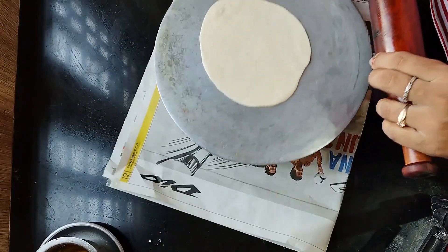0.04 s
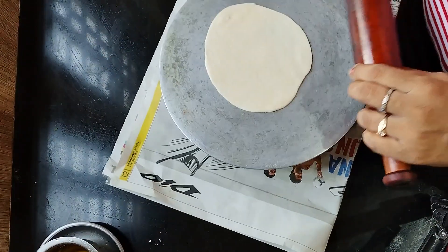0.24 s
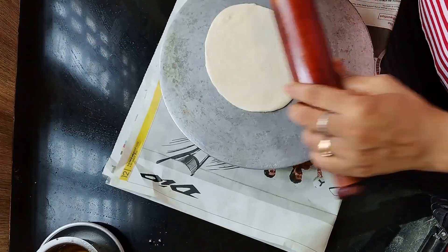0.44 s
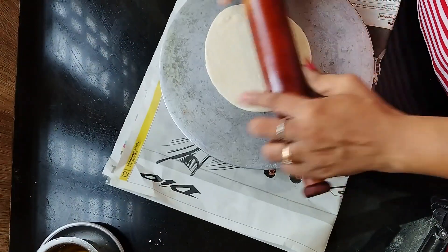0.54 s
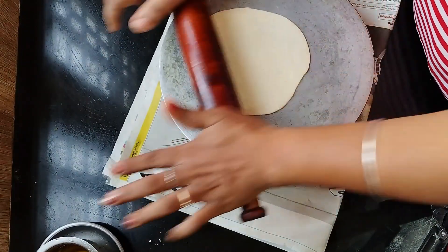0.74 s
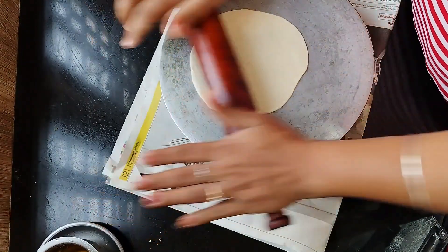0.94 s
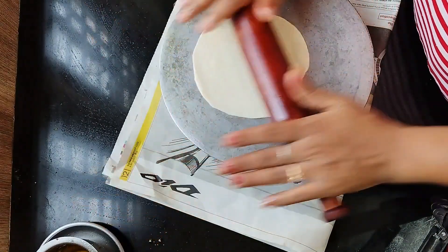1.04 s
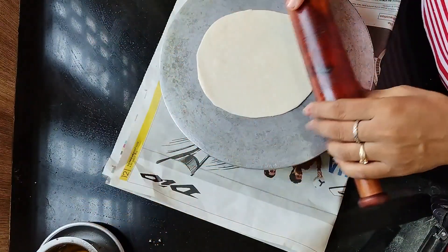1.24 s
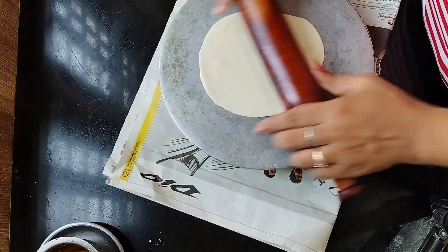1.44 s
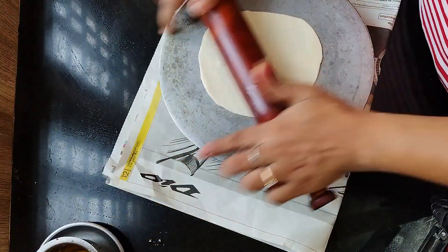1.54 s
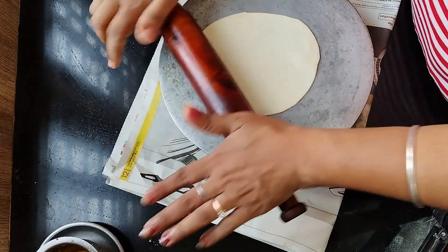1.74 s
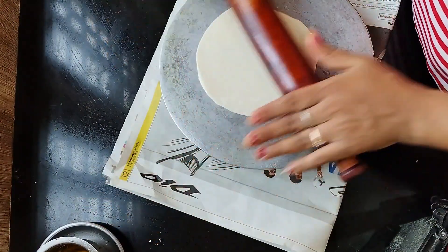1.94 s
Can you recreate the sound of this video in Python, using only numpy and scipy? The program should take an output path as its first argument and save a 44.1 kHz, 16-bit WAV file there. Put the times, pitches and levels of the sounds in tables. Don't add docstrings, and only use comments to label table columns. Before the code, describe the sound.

A wooden rolling pin strikes a round metal plate: paper rustle and a touch at 0.2 s, a loud bright knock at 0.25, a heavy dull bounce at 0.28, smaller choked bounces, then a low tone swelling near 0.4. Soft rolling follows, with low air whoops at 0.65 and 0.85, ring clinks at 0.92 and 1.23, and a muffled rim bump at 1.58. Machine thumps pulse faintly through the kitchen wall.

```python
import sys
import numpy as np
from scipy import signal
from scipy.fft import rfft, irfft
from scipy.io import wavfile

SR = 44100
rng = np.random.default_rng(int(sys.argv[2]) if len(sys.argv) > 2 else 0)


def dump_mix(stems):
    frames = np.atleast_2d(stems).T
    limited = np.clip(frames, -1, 1)
    pcm = np.round(limited * 32767).astype(np.int16)
    wavfile.write(sys.argv[1], SR, pcm)


def linear_from_db(decibels):
    return 10 ** (np.asarray(decibels, float) / 20)


N = 88200


def in_time(rows):
    seconds, level_db = np.transpose(rows)
    return np.interp(np.arange(N) / SR, seconds, level_db)


def at_hz(points, hz):
    point_hz, value = np.transpose(points)
    return np.interp(np.log(hz), np.log(point_hz), value)


def rms_one(x):
    return x / np.sqrt(np.mean(x ** 2) + 1e-20)


def drift(rate):
    r = np.exp(-80 * np.pi * rate / SR)
    white = rng.standard_normal(N // 40 + 2002)
    slow = signal.lfilter([1], [1, -2 * r, r * r], white)[2000:]
    return np.interp(np.arange(N) / 40, np.arange(len(slow)), rms_one(slow))


def bands(white):
    length = white.shape[-1]
    spec, hz = rfft(white), np.maximum(np.fft.rfftfreq(length, 1 / SR), 1)
    for centre in 22 * 2 ** np.arange(0, 9.6, .5):
        shape = np.cos(np.clip(np.log2(hz / centre) * np.pi, -np.pi / 2, np.pi / 2))
        yield centre, irfft(spec * shape, length)


# frequency in Hz, likeness from 0 to 1.
LIKENESS = [(30, 1), (90, 0.25), (200, 0.94), (450, 0.16), (1000, 0.033), (3000, 0.014), (8000, 0.02)]


def noise(spectrum, patchy_db):
    hz = np.maximum(np.fft.rfftfreq(N, 1 / SR), 1)
    inside = (hz > spectrum[0][0]) & (hz < spectrum[-1][0])
    white = irfft(rfft(rng.standard_normal((2, N))) * linear_from_db(at_hz(spectrum, hz)) * inside, N)
    out, together = 0, drift(11.4)
    for centre, (mid, side) in bands(white):
        alike = at_hz(LIKENESS, centre)
        flicker = linear_from_db(patchy_db * (0.31 * together + drift(6.3)))
        out = out + flicker * (np.sqrt(1 + alike) * mid + np.sqrt(1 - alike) * side * [[1], [-1]])
    return rms_one(out)


CHOKE_S, CHOKED_DB, PORT_LAG_S = .004, -24, .00016


def strike(s, db, free_s, modes, soft_hz=20000, pan_db=0):
    t = np.arange(N) / SR - s
    on = t > 0
    t = t[on][:SR // 2]
    hz, level_db, t60 = np.transpose(modes)[:, :, None]
    gain = linear_from_db(db + level_db) / (1 + (hz / soft_hz) ** 4)
    onset = np.sin(np.pi / 2 * np.minimum(t * soft_hz / 2, 1)) ** 2
    choke = linear_from_db(CHOKED_DB * np.clip((t - free_s) / CHOKE_S, 0, 1))
    lag = PORT_LAG_S * np.sin(hz / 92) * np.minimum(hz / 900, np.minimum(1, 1500 / hz))
    decay = np.exp(-t * np.log(1000) / t60)
    out, first = np.zeros((2, N)), np.argmax(on)
    for c, side in enumerate((1, -1)):
        wave = np.sin(2 * np.pi * hz * np.maximum(t + side * lag / 2, 0)) * decay
        out[c, first:first + len(t)] = linear_from_db(side * pan_db / 2) * onset * choke * (gain * wave).sum(0)
    return out


def burst(s, db, decay_s, low_hz, high_hz, order=2):
    t, out = np.arange(SR // 3) / SR, np.zeros((2, N + SR))
    white = rng.standard_normal((3, len(t)))
    puff = (white[:2] + 0.92 * white[2]) * np.exp(-t / decay_s) * linear_from_db(db)
    band = signal.butter(order, [low_hz, high_hz], "band", fs=SR, output="sos")
    start = int(s * SR)
    out[:, start:start + len(t)] = signal.sosfilt(band, puff)
    return out[:, :N]


# frequency in Hz, level in dB.
AIR_SPECTRUM = [(10, 0.5), (30, -2), (92, -12.5), (144, -15), (231, -15.5), (422, -10), (953, -22.5),
                (8000, -24.5)]
HISS_SPECTRUM = [(7000, -17), (7980, -2), (9810, -15.5), (11100, -3), (11700, 2), (14100, -18),
                 (15200, 1.5), (15800, -18.5), (16200, -2)]
AIR_DB, HISS_DB = -51.5, -61


def air_and_hiss():
    air = linear_from_db(AIR_DB) * noise(AIR_SPECTRUM, patchy_db=2.7)
    return air + linear_from_db(HISS_DB) * noise(HISS_SPECTRUM, patchy_db=0.5)


# start in seconds, level in dB.
THUMPS = [(0.066, -39), (0.274, -43.5), (0.462, -40), (0.66, -36.5), (0.867, -38), (1.079, -37.5),
          (1.282, -38.5), (1.49, -37), (1.676, -36.5), (1.9, -34.5)]
# frequency in Hz, level in dB, decay by 60 dB in seconds.
WALL_MODES = [(88.8, 0, 0.22), (112.7, 1, 0.047), (167.5, 1, 0.081), (230, -7.5, 0.27), (56, -18.5, 0.076)]
HUM_HZ, HUM_WIDTH_HZ, HUM_DB = 89.35, 9.7, -50.5


def machine():
    r, w = np.exp(-np.pi * HUM_WIDTH_HZ / SR), 2 * np.pi * HUM_HZ / SR
    white = rng.standard_normal(N + SR)
    hum = signal.lfilter([1, 0, -1], [1, -2 * r * np.cos(w), r * r], white)[SR:]
    thumps = sum(strike(s, db, 1, WALL_MODES, soft_hz=298) for s, db in THUMPS)
    return (linear_from_db(HUM_DB) * rms_one(hum) - thumps) * linear_from_db([[-.6], [.6]])


# time in seconds, level in dB.
SLIDE_LEVEL = [(.13, -99), (.17, -46.5), (.195, -43.5), (.24, -48.5), (.3, -72.5), (.4, -83.5)]
ROLL_LEVEL = [(0, -49.5), (.15, -56), (.6, -59), (.9, -47), (1.0, -55.5), (1.3, -58.5), (1.5, -67),
              (1.7, -76.5), (2, -51)]
# frequency in Hz, level in dB.
PAPER_SPECTRUM = [(180, -22), (300, -8), (1260, -8), (3000, -11), (7500, -15), (9000, -30), (12000, -27),
                  (15600, -54)]
ROLLING_SPECTRUM = [(120, -41), (230, -0.5), (300, -8.5), (430, -3.5), (700, -10), (1200, -17),
                    (2500, -27.5)]


def slide_and_roll():
    slide = linear_from_db(in_time(SLIDE_LEVEL)) * noise(PAPER_SPECTRUM, patchy_db=2.0)
    return slide + linear_from_db(in_time(ROLL_LEVEL)) * noise(ROLLING_SPECTRUM, patchy_db=3.0)


# start in seconds, level in dB, length in seconds, from Hz, to Hz.
WHOOPS = [
    (0.638, -44, 0.046, 89.3, 236),
    (.84, -44.5, 0.035, 95, 177),
]


def dough_whoops():
    out = 0
    for s, db, length_s, from_hz, to_hz in WHOOPS:
        u = np.clip((np.arange(N) / SR - s) / length_s, 0, 1)
        cycles = length_s * (from_hz * u + (to_hz - from_hz) * u ** 2 / 2)
        out = out + linear_from_db(db) * np.sin(np.pi * u) * np.sin(2 * np.pi * cycles)
    return out


# frequency in Hz, level in dB, decay by 60 dB in seconds.
EARLIER_RING = [(1520, -49, 0.26), (1960, -41, .15), (1330, -50, 0.27), (2250, -49, 0.17),
                (4200, -54.5, .15), (462, -46, 0.23)]
# start in seconds, level in dB, frequency in Hz.
TICKS = [
    (1.83, -36, 6250),
    (0.24, -61, 5100),
    (1.425, -34.5, 2300),
]


def ticks():
    puffs = sum(burst(s, db, 0.0093, hz / 1.13, hz * 0.99) for s, db, hz in TICKS)
    return strike(-0.082, 0, 0.46, EARLIER_RING) + puffs


def scuffed_hits(rows, modes, soft_hz, pan_db):
    out = 0
    for s, db, free_s, scuff_hz in rows:
        scuff = burst(s, db + 5, 0.006, scuff_hz / 1.86, scuff_hz * 1.057, order=3)
        out = out + strike(s, db, free_s, modes, soft_hz, pan_db) + scuff
    return out


# start in seconds, level in dB, free ring in seconds,
# scuff in Hz.
CLINKS_A = [(0.9175, -42, .1, 5000), (0.9225, -43, .1, 4500), (0.929, -45, .1, 3300),
            (0.936, -46, .1, 4800), (0.946, -48, .1, 4200), (.957, -52, .1, 3900)]
CLINKS_B = [
    (1.2283, -38.5, 0.19, 3230),
    (1.2365, -31.5, 0.22, 5680),
    (1.244, -49, 0.051, 1380),
]
# frequency in Hz, level in dB, decay by 60 dB in seconds.
RING_A_MODES = [(2322, -4, .08), (3100, -8, .03), (3800, -8, .025), (4199, -6, .04), (4600, -6, .025),
                (4900, -5, .025), (5200, -5, .025)]
RING_B_MODES = [(705, -8, 0.05), (1312, -8, 0.17), (1390, 0, 0.1), (2290, -14, .15), (2362, -10, 0.3),
                (2397, -3, 0.1), (3666, -8, 0.06), (3890, -7, 0.09), (4339, -2, 0.08), (5650, -7, 0.06),
                (5803, -13, .2), (5932, -9, 0.25), (6100, 3, 0.045), (6158, -9, .12)]


def ring_clinks():
    first = scuffed_hits(CLINKS_A, RING_A_MODES, 8000, -1.5)
    return first + scuffed_hits(CLINKS_B, RING_B_MODES, 8000, -.6)


# start in seconds, level in dB, free ring in seconds, scuff in Hz.
BUMPS = [
    (0.2062, -24.5, 0.02, 775),
    (1.571, -49, 0.16, 380),
    (1.5768, -30, 0.11, 445),
    (1.5815, -22, 0.088, 705),
    (1.590, -33, .1, 430),
    (1.596, -28.5, .1, 800),
    (1.621, -34.5, 0.069, 448),
    (1.68, -43.5, .1, 604),
]
# frequency in Hz, level in dB, decay by 60 dB in seconds.
RIM_MODES = [(298.5, -8, 0.37), (422, -5.5, 0.109), (501, -10, 0.18), (699.4, 1, 0.051), (723, -15, 0.06),
             (966, -2.5, 0.018), (1196, -6, 0.07)]


def rim_bumps():
    return scuffed_hits(BUMPS, RIM_MODES, 1500, .3)


# start in seconds, level in dB, frequency in Hz, rise in seconds,
# decay by 60 dB in seconds.
SWELL = (.35, -11.5, 447, .04, .26)


def plate_swell():
    s, db, hz, rise_s, t60 = SWELL
    t = np.maximum(np.arange(N) / SR - s, 0)
    envelope = np.minimum(t / rise_s, 1) * np.exp(-t * np.log(1000) / t60)
    return linear_from_db(db) * envelope * np.sin(2 * np.pi * hz * t)


# start in seconds, level in dB, contact cut-off in Hz, free ring before the choke in
# seconds, left over right in dB.
KNOCKS = [
    (0.2063, -15.5, 700, 0.11, 1),
    (0.2468, -2.5, 2950, 0.039, 1),
    (0.2846, 1, 540, .0165, 0.5),
    (0.303, -14, 1200, 0.017, -4),
    (0.3145, -15.5, 537, 0.0095, -2),
    (0.354, -22, 1100, .02, 0),
    (0.6842, -31, 540, 0.0067, -1),
    (0.785, -31.5, 520, 0.012, 3),
]
# frequency in Hz, level in dB, decay by 60 dB in seconds.
PLATE_MODES = [(450, 0, .36), (490, -15, .15), (762, -6, .07), (690, -15, .1), (916, -17, .1),
               (970, -17, .15), (1090, -9, .3), (1223, -14, .06), (1410, 1.5, .03), (1557, -5, .2),
               (1740, -18, .1)]
RIM_RING = [(1089, -24, .45), (2341, -32, .4), (2570, -38, .2), (4600, -44, .25), (5120, -42, .12),
            (5520, -42, .12), (3455, -38, .1), (3480, -39, .38), (3489, -39, .38)]
COUNTER_MODES = [(200.6, -10, 0.12), (124, -17, 0.15), (303, -45, 0.037), (67.5, -17.5, 0.061)]
COUNTER_DB = -21.5
PLATE_EDGE_HZ = 411


def plate():
    ring, counter = 0, 0
    for s, db, soft_hz, free_s, pan_db in KNOCKS:
        bright_db = db + 24 * np.log10(soft_hz / 3000)
        ring = ring + strike(s, db, free_s, PLATE_MODES, soft_hz, pan_db)
        ring = ring + burst(s, bright_db + 4, .005, 525, 1600)
        ring = ring + burst(s, bright_db - 35, 0.06, 1500, 6500, order=3)
        ring = ring + burst(s, bright_db - 0.5, 0.046, 598, 1444, order=3)
        counter = counter + strike(s, db + COUNTER_DB, 1, COUNTER_MODES)
    edge = signal.butter(4, PLATE_EDGE_HZ, "high", fs=SR, output="sos")
    rim = strike(KNOCKS[1][0], 0, 1, RIM_RING, soft_hz=7480)
    return signal.sosfilt(edge, ring + 1e-18) + rim + counter


# frequency in Hz, decay by 60 dB in seconds.
ROOM_T60 = [(60, 0.99), (450, 0.82), (1500, 0.46), (4000, .38), (9000, 0.16)]
# frequency in Hz, level in dB.
ROOM_COLOUR = [(200, -5), (450, -22), (570, -19), (700, -1), (800, 1), (1500, -1), (5000, 4)]
ROOM_DB, ROOM_BUILD_S = -8, 0.033


def room(x):
    t, tail = np.arange(SR) / SR, 0
    for hz, band in bands(rng.standard_normal((3, SR))):
        t60 = at_hz(ROOM_T60, hz)
        tail = tail + band * np.exp(-t * np.log(1000) / t60) * np.sqrt(.5 / t60)
    tail = irfft(rfft(tail) * linear_from_db(at_hz(ROOM_COLOUR, np.arange(SR // 2 + 1) + 1)), SR)
    tail = tail * np.minimum(t / ROOM_BUILD_S, 1) / np.sqrt(SR * 0.017)
    wet = signal.fftconvolve(x.mean(0)[None], tail, axes=1)[:, :N]
    low = signal.sosfilt(signal.butter(2, 560, fs=SR, output="sos"), wet[2] - wet[:2])
    return linear_from_db(ROOM_DB) * (wet[:2] + 0.38 * low)


def scene():
    background = air_and_hiss() + machine()
    pin = slide_and_roll() + dough_whoops() + plate_swell()
    small = ticks() + ring_clinks() + rim_bumps()
    big = plate()
    return background + pin + small + big + room(big + .5 * small)


def low_pass(x):
    return signal.sosfilt(signal.butter(12, 15820, fs=SR, output="sos"), x)


AGC_ABOVE_DB, AGC_SHARE, AGC_RELEASE_DB_PER_S = -25.5, 0.047, 29.5
CUTOFF_HZ = 16300


def record(dry):
    fall = AGC_RELEASE_DB_PER_S * np.arange(N) / SR
    peak_db = 20 * np.log10(np.abs(dry).max(0) + 1e-6)
    level_db = np.maximum.accumulate(peak_db + fall) - fall
    over_db = np.maximum(level_db - AGC_ABOVE_DB, 0)
    dip_db = signal.lfilter([.002], [1, -.998], AGC_SHARE * over_db)
    x = dry * linear_from_db(-dip_db)
    x = x / (1 + np.abs(x) ** 8) ** (1 / 8)
    top_cut = signal.cheby2(12, 70, CUTOFF_HZ, fs=SR, output="sos")
    return low_pass(signal.sosfilt(top_cut, x))


dry = scene()
out = record(dry)
dump_mix(out)
```